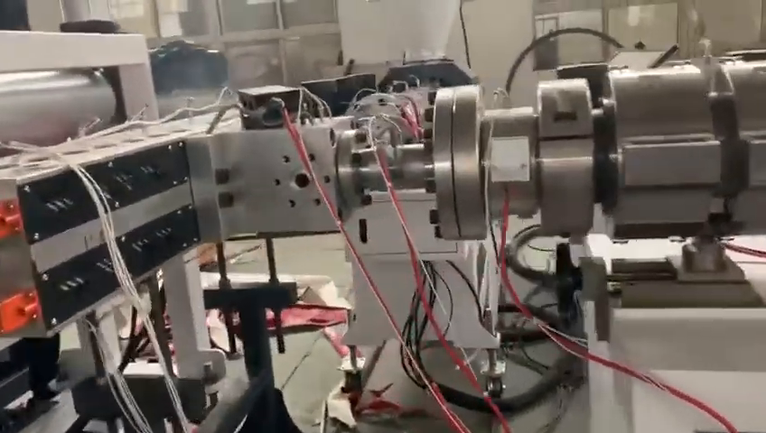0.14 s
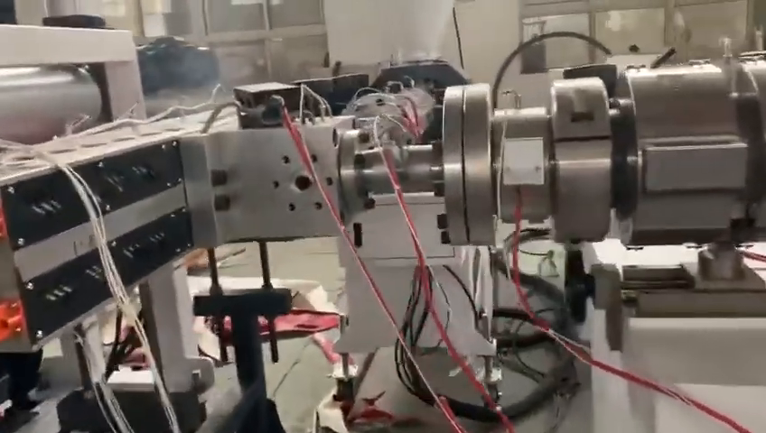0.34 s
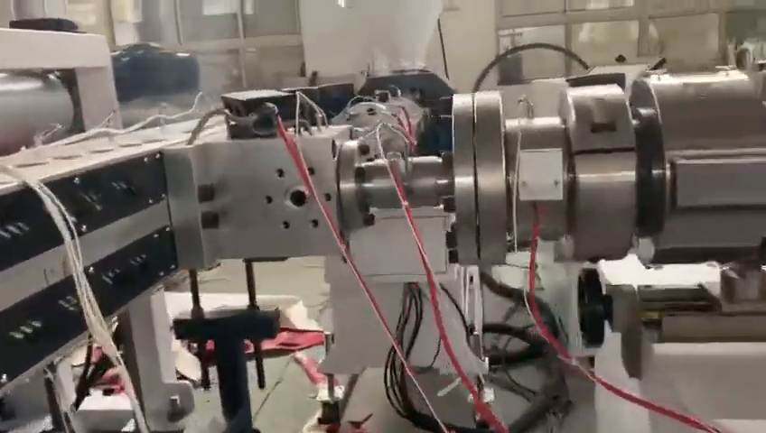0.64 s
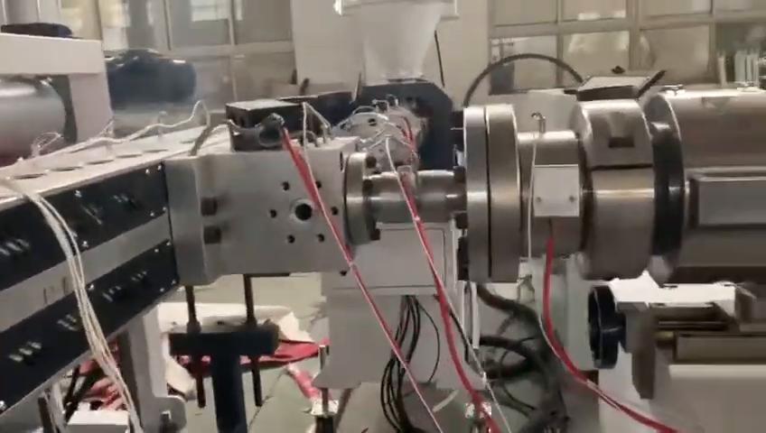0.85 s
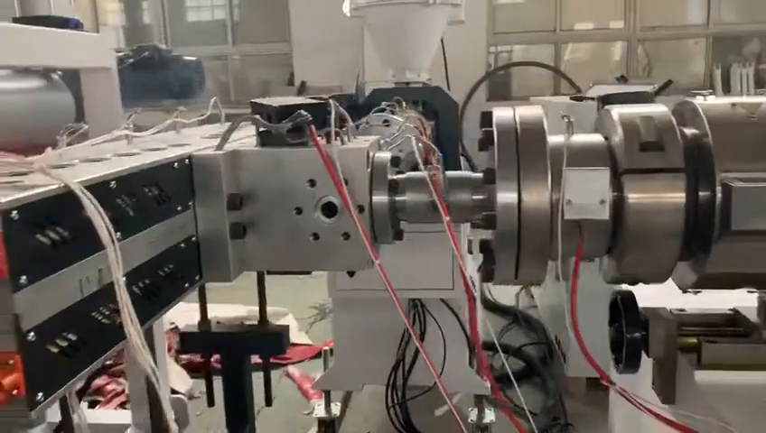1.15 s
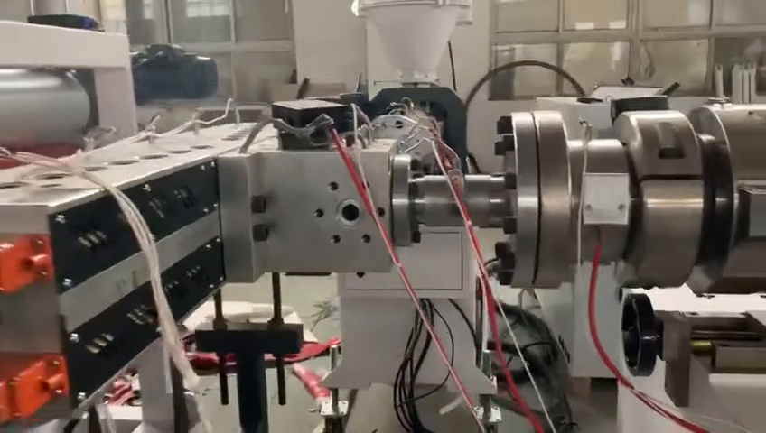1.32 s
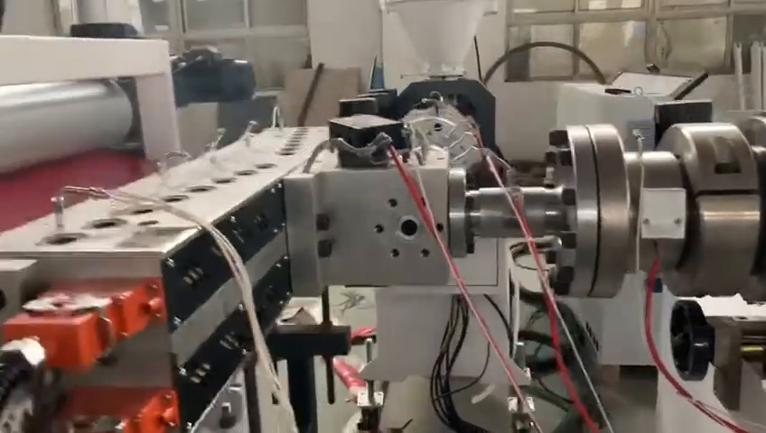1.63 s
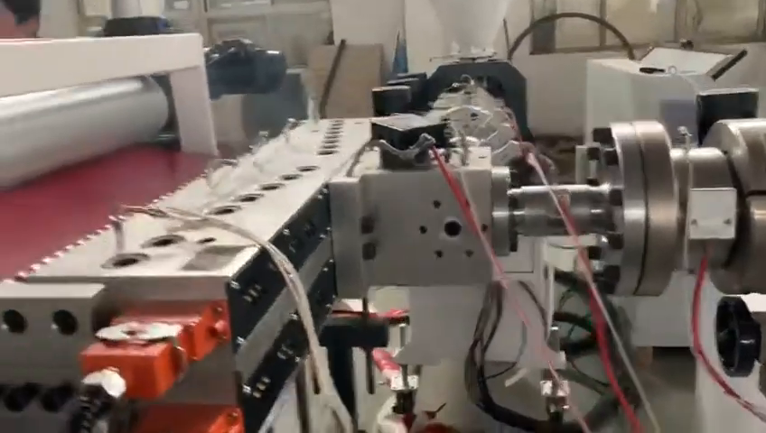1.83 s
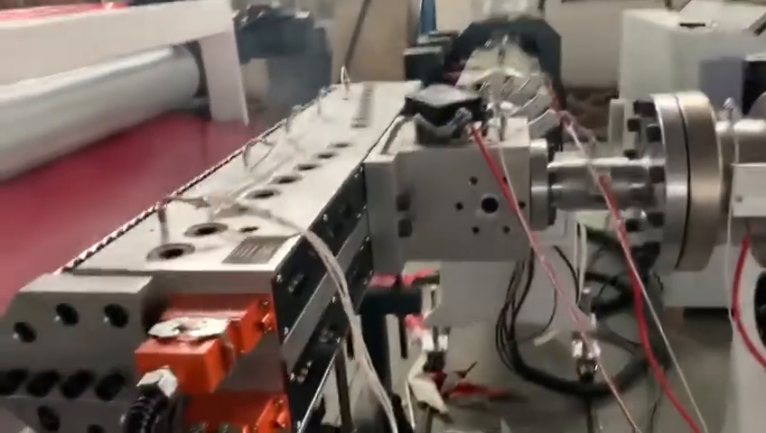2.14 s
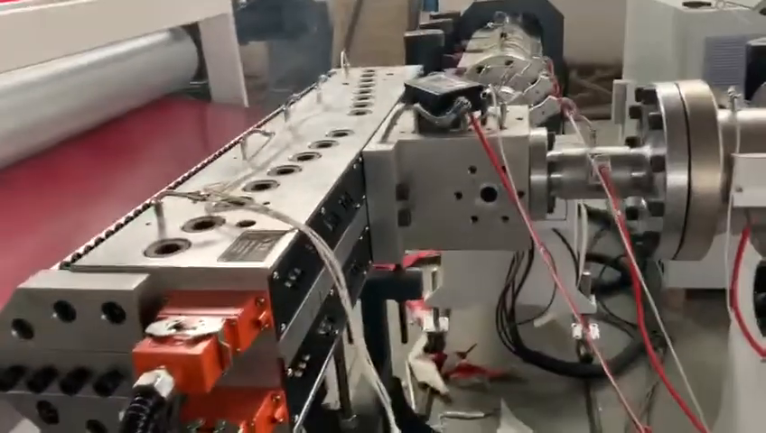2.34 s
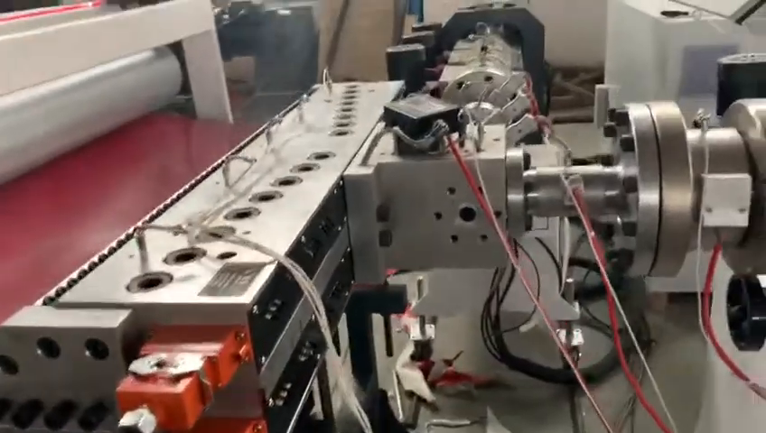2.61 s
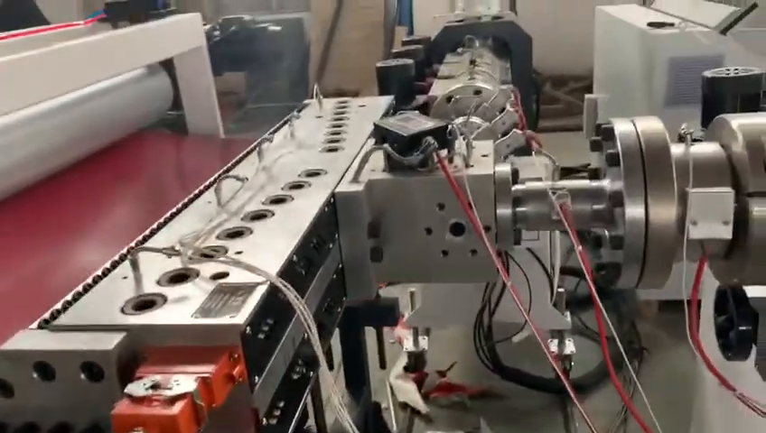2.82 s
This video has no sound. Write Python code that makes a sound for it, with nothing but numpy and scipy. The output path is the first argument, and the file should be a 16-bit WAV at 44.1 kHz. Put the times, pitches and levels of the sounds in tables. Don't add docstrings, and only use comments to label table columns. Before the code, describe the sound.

A running extrusion line drones steadily in a factory hall, with low roar, motor hum, wavering high whine and air hiss; a distant bang fades at the start, and a sharp metal tick lands midway, heard from a handheld microphone.

```python
import sys
import numpy as np
from scipy import signal
from scipy.io import wavfile
from scipy.ndimage import uniform_filter1d

SR = 44100
rng = np.random.default_rng(int(sys.argv[2]) if len(sys.argv) > 2 else 0)


def amplitude_ratio(level_db):
    exponent = np.asarray(level_db, float) / 20
    return 10 ** exponent


def to_wav(s):
    ch = np.atleast_2d(s).T
    pcm = np.round(np.clip(ch, -1, 1) * 32767)
    wavfile.write(sys.argv[1], SR, pcm.astype(np.int16))


N = 130977
T = np.arange(N) / SR

# frequency in Hz, density in dB per Hz.
ROAR_COLOUR = [(36, -10.5), (120, -8), (250, 1), (500, -5.5), (1000, -9), (1600, -14.5), (3300, -12.5),
               (4500, -18.5)]
HISS_COLOUR = [(2000, 3), (3000, -5.5), (5500, -1), (7500, 2), (11000, 1.5), (14500, 1.5), (15400, 7.5),
               (15800, 6.5)]
BANG_COLOUR = [(50, -13), (90, 1), (220, 2.5), (400, -8), (750, -4.5), (1500, -9.5), (5000, -14)]
# frequency in Hz, likeness from 0 to 1.
ROAR_LIKENESS = [(30, 0.99), (100, 0.9), (350, 0.71), (550, 0.37), (900, 0.15), (1700, 0.4), (2500, 0.042),
                 (3600, 0.072)]
HISS_LIKENESS = [(3000, 0.44), (6000, 0.32), (7400, 0.81), (7800, 0.96), (16000, 1)]
# centre in Hz, width in Hz, boost (negative:
# dip) in dB.
CASING_MODES = [(240, 40, 1.5), (2500, 350, 4), (2750, 250, 3), (3330, 200, -9), (4050, 150, -3),
                (5450, 240, -8), (9050, 200, 1)]
MOTOR_ORDERS_HZ = np.array([37.7, 145, 193.8, 230, 241, 262, 291.5, 388.8, 432, 759, 1059.2])
# order in Hz, centre in seconds, half length in seconds,
# level in dB, lead of the left port in radians.
HUM_SWELLS = [(38, 1.63, 0.95, -45, 0.), (38, 2.83, 0.23, -49, -0.7), (38, 0.65, 0.55, -53, 0.5),
              (145, 0.55, 0.35, -41.5, 0.2), (194, 0.24, 0.52, -38.5, 0.3), (194, 0.83, 0.55, -40.5, 0.2),
              (194, 1.55, 0.48, -37.5, -0.5), (291, 2.02, 0.17, -42, -.3), (262, 1.93, 0.11, -37, 0.2),
              (230, 2.76, 0.15, -44, -1), (145, 0.083, .25, -40.5, -.2), (194, 2.57, 0.76, -35, -0.9),
              (242.8, 0.058, 0.11, -31, -0.7), (242, 0.89, 0.61, -36, -0.68), (242, 1.65, 0.28, -42, -0.2),
              (242, 2.37, 0.2, -37.5, 0.6), (292.2, 0.64, 0.24, -39.5, 0.3), (291, 1.36, 0.2, -50, -0.21),
              (389, 0.76, 0.43, -40.5, -1.5), (389, 1.47, 0.61, -36, 0), (389, 2.38, 0.67, -37, -0.4),
              (432, 2.54, 0.51, -42.5, 0.5), (762, 0.63, 0.3, -46.5, -0.5), (759, 2.5, 0.55, -58, -0.71),
              (1059, 0.43, 0.5, -41, -0.3), (1059, 1, 0.15, -48, -1.5), (1059, 1.46, 0.63, -45.5, -1.2),
              (1059, 2.43, 0.85, -43, -0.8)]
# sideband in Hz, centre in seconds, half length in seconds,
# level in dB, lead of the left port in radians.
GEAR_SWELLS = [(2277, 3.2, 0.57, -46, -7), (2375, 1.02, 0.35, -38, 1.3), (2375, 2.04, 0.43, -38.5, 1.3),
               (2375, 2.72, 0.5, -42.5, 1), (2424, 1.91, 0.29, -39, 0.5), (2424, 2.96, 0.18, -47, -3),
               (2473, 0.042, 0.22, -34, 4), (2473, 0.54, 0.16, -36.5, 1.3), (2473, 0.924, 0.33, -35, 1.3),
               (2473, 1.356, 0.14, -30, -2), (2473, 1.5, 0.083, -36, 3.5), (2523, 1.58, 0.058, -34.5, 2),
               (2572, 1.87, 0.14, -37, 1), (2277, 0.46, 0.053, -40, 1.5), (2277, 1.3, 0.61, -46.5, 2.5),
               (2326, 2.7, 0.14, -49.5, 3.5), (2424, 0.57, .3, -43, 1.5), (2375, 0.29, 0.34, -44.5, 1.5),
               (2473, 2.82, 0.75, -33.5, 1.3), (2523, .48, 0.18, -33.5, 1.5), (2523, 1, 0.48, -32, 1.13),
               (2523, 1.89, 0.35, -40, 3.5), (2523, 3.23, 0.63, -32, 13), (2572, 0.28, 0.83, -34.5, 4),
               (2572, 1.45, 0.41, -35.5, 2), (2572, 2.57, 0.45, -35.5, -2.5), (2621, 0.43, 0.16, -33, 1.2),
               (2621, 1.07, 0.23, -41, 3.5), (2621, 1.83, 0.27, -40.5, 1), (2621, 2.76, 0.19, -37.5, 1),
               (2719, 0.622, 0.093, -37, 1)]
# time in seconds, level in dB, casing ring in Hz.
RUB_COURSE = [
    (0, -43.5, 4580),
    (.3, -36.5, 4330),
    (.7, -36.5, 4350),
    (.92, -52.5, 4600),
    (1.25, -42.5, 4680),
    (1.4, -37.5, 4430),
    (1.9, -38, 4600),
    (2.3, -37, 4600),
    (2.6, -38, 4600),
    (2.97, -40.5, 4480),
]
LOOSE_PARTS_HZ = np.array([985, 2714, 4185.5, 925])
# tone in Hz, centre in seconds, half length in seconds,
# level in dB, lead of the left port in radians.
SQUEAL_SWELLS = [
    (4160, 0.54, 0.19, -40.5, -12),
    (2736, 2.04, 0.23, -34.5, 4),
    (983, 0.81, 0.48, -45, 1.4),
    (925, 2.36, 0.19, -44, -.8),
]
# frequency in Hz, level in dB,
# time to fall 60 dB in seconds.
STEEL_MODES = [(5340, -17, .02), (7000, -14, .015), (9028, 0, .016), (10940, -10, .02), (11370, -10, .02)]
BOLT_MODES = [(3900, -12, .06), (5222, 0, .04), (6821, -9, .04), (5600, -5, .025), (9200, -10, .02),
              (11000, -6, .015)]
PIPE_MODES = [(1254, 0, .15), (1669, -6, .35), (1771, -3, .25), (1400, -8, .06)]
# start in seconds, level in dB, left over right in dB, pitch ratio.
STEEL_STROKES = [
    (.385, -20, 0., 1.22),
    (1.5311, -7.8, 0., 1.),
    (1.5378, -21, 0., 1.),
    (1.6405, -24, 0., 1.),
    (1.6465, -20, 3., 1.),
    (1.6595, -23, 0., 1.),
]
BOLT_STROKES = [
    (1.006, -27, -2., .745),
    (1.3612, -21, -5., 1.),
]
PIPE_STROKES = [
    (2.541, -28, 2, 0.99),
]


def evened(x):
    return x / np.sqrt(np.mean(x ** 2) + 1e-20)


def read(points, hz):
    f, value = np.transpose(points)
    return np.interp(np.log(hz + 1), np.log(f + 1), value)


def wander(rate_hz, count):
    f = np.geomspace(rate_hz / 8, rate_hz, 12)[:, None]
    t = np.arange(0, N + 256, 256) / SR
    waves = np.sin(2 * np.pi * (f * t + rng.random((count, 12, 1)))) / np.sqrt(f)
    return np.array([np.interp(T, t, evened(v)) for v in waves.sum(1)])


def noise(colour, same, lag_s, turn=0., patchy_db=1., size=1024):
    hop = size // 4
    hz = np.fft.rfftfreq(size, 1 / SR)
    a, b, c, d, patches = rng.standard_normal((N // hop + 5, len(hz), 5)).T
    patches = uniform_filter1d(patches, size=10, axis=0)
    patches = evened(uniform_filter1d(patches, size=8, axis=1))
    left, other = a + 1j * b, c + 1j * d
    like = np.clip(read(same, hz), 0, 1)[:, None]
    lead = 2 * np.pi * hz * lag_s + turn
    port = np.exp(1j * (lead - 0.74 * np.sin(2 * lead)))[:, None]
    z = np.array([left, like * port * left + np.sqrt(1 - like ** 2) * other])
    low_end, high_end = (colour[0][0] * 0.84, -100), (colour[-1][0] * 1.15, -100)
    db = read([low_end] + list(colour) + [high_end], hz)
    db = db + sum(up_db / (1 + (2 * (hz - f) / width) ** 2) for f, width, up_db in CASING_MODES)
    z = z * amplitude_ratio(db[:, None] + patchy_db * patches)
    return evened(signal.istft(z, nperseg=size, noverlap=size - hop)[1][:, :N])


def roar():
    level = amplitude_ratio(-27.5 + 0.13 * wander(3.27, count=1))
    return level * noise(ROAR_COLOUR, ROAR_LIKENESS, lag_s=.00024, patchy_db=2.0, size=2048)


def hiss():
    gust = amplitude_ratio(-32.5 + .5 * wander(80., count=1)) * (1 + 1.6 * np.exp(-T / 0.044))
    return gust * noise(HISS_COLOUR, HISS_LIKENESS, lag_s=.000202, turn=-1.37, patchy_db=2.2)


def bang():
    return amplitude_ratio(-21 - 60 * T / 0.59) * noise(BANG_COLOUR, ROAR_LIKENESS, lag_s=.00024, patchy_db=1.5)


def swells(rows, tones_hz, waver, flutter_db, pan_db=0.):
    out = np.zeros((2, N))
    start = rng.random(len(tones_hz))
    flutter = wander(10., count=4)
    for k, (hz, s, half, db, lead) in enumerate(rows):
        near = slice(max(round((s - 2 * half) * SR), 0), round((s + 2 * half) * SR))
        tone = np.argmin(abs(tones_hz - hz))
        turn = 2 * np.pi * (tones_hz[tone] * T[near] + start[tone]) + waver * flutter[tone % 4, near]
        level = amplitude_ratio(db + flutter_db * flutter[[k % 4, (k + 1) % 4], near])
        bell = np.exp(-2 * abs((T[near] - s) / half) ** 3) * level
        out[:, near] += np.sqrt(2) * bell * np.cos([turn + lead / 2, turn - lead / 2])
    return out * amplitude_ratio([[pan_db / 2], [-pan_db / 2]])


def motor_hum():
    return swells(HUM_SWELLS, MOTOR_ORDERS_HZ, waver=.35, flutter_db=1.6, pan_db=.7)


def gear_whine():
    mesh_hz, shaft_hz = 2473.4, 49.15
    return swells(GEAR_SWELLS, mesh_hz + shaft_hz * np.arange(-5, 7), waver=.12, flutter_db=1.2)


def resonate(x, hz, width):
    turn = np.exp(2j * np.pi * np.cumsum(hz * np.ones(N)) / SR)
    r = np.exp(-np.pi * width / SR)
    return 2 * (turn * signal.lfilter([1 - r], [1, -r], x / turn)).real


def rub():
    s, db, hz = np.transpose(RUB_COURSE)
    ring = np.interp(T, s, hz)
    force = amplitude_ratio(2.1 * np.minimum(rng.exponential(1, (2, N)), 5))
    grit = force * (rng.random((2, N)) < .1) * rng.standard_normal((2, N))
    low = evened(resonate(resonate(grit, ring, 400), ring, 1000))
    top = evened(resonate(resonate(grit[:, ::-1], 6700, 480), 6700, 600))
    top = top * amplitude_ratio([[-3.5], [1]]) * amplitude_ratio((4250 - ring) / 120)
    broad = evened(resonate(resonate(rng.standard_normal((2, N)), 4800, 2100), 5000, 2200))
    return amplitude_ratio(np.interp(T, s, db)) * (low + top + amplitude_ratio(-3) * broad)


def squeal():
    return swells(SQUEAL_SWELLS, LOOSE_PARTS_HZ, waver=1.3, flutter_db=3.)


def hits(rows, modes, rise_s, crack_db):
    out, t = np.zeros((2, N + SR)), np.arange(SR // 4) / SR
    for s, db, pan_db, pitch in rows:
        ring = sum(amplitude_ratio(d - 60 * t / t60) * np.sin(2 * np.pi * f * pitch * t) for f, d, t60 in modes)
        ring = ring + amplitude_ratio(crack_db - 60 * t / .007) * np.diff(rng.standard_normal(len(t) + 1))
        ring = ring * np.minimum(t / rise_s, 1)
        for ch in range(2):
            for late_s, echo_db in [(0, 0), (.0045, -11), (.021, -16)]:
                at = round((s + late_s * (1 + 0.092 * ch)) * SR) + 8 * (1 - ch)
                out[ch, at:at + len(t)] += amplitude_ratio(db + echo_db + (.5 - ch) * pan_db) * ring
    return out[:, :N]


def steel_ticks():
    return hits(STEEL_STROKES, STEEL_MODES, rise_s=.0008, crack_db=-2)


def bolt_ticks():
    return hits(BOLT_STROKES, BOLT_MODES, rise_s=.0012, crack_db=-4)


def pipe_knock():
    return hits(PIPE_STROKES, PIPE_MODES, rise_s=.003, crack_db=-30)


def scene():
    air = roar() + hiss() + bang()
    machine = motor_hum() + gear_whine() + rub() + squeal()
    return air + machine + steel_ticks() + bolt_ticks() + pipe_knock()


def roll_off(x):
    return signal.sosfilt(signal.butter(12, 17010, fs=SR, output="sos"), x)


def record(dry):
    rumble_cut = signal.butter(4, 29, "high", fs=SR, output="sos")
    edge = signal.firwin(511, 15540, window=("kaiser", 8), fs=SR)
    mix = signal.oaconvolve(signal.sosfilt(rumble_cut, dry), edge[None], "same")
    return roll_off(mix)


dry = scene()
out = record(dry)
to_wav(out)
```